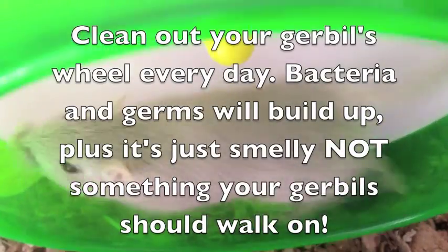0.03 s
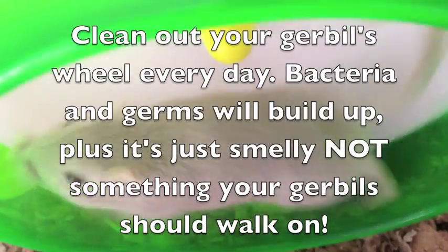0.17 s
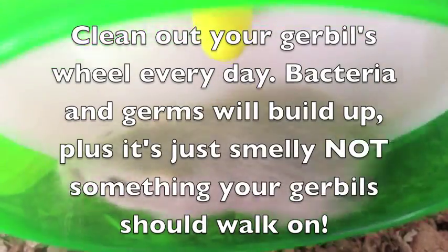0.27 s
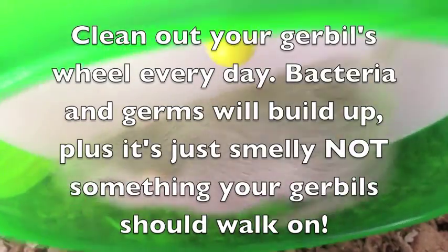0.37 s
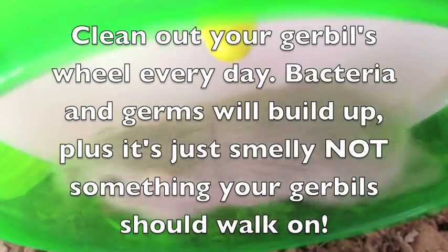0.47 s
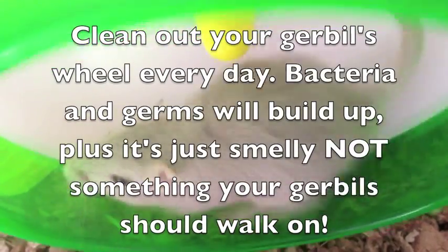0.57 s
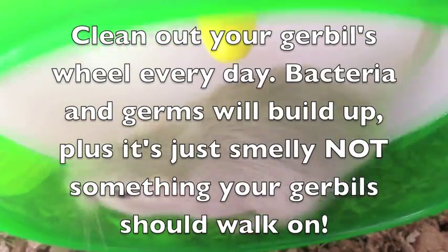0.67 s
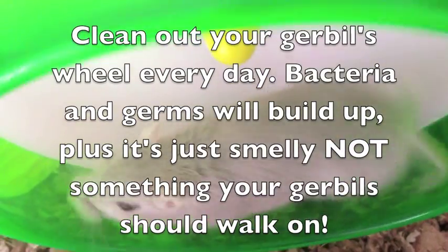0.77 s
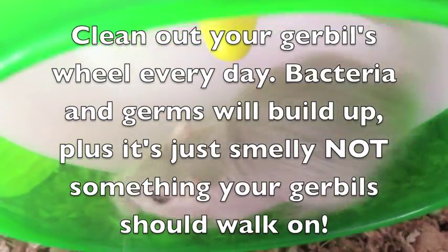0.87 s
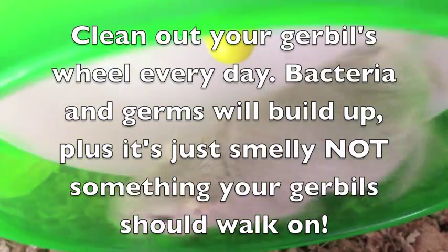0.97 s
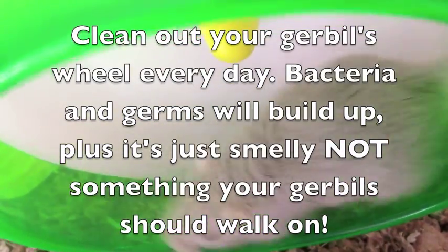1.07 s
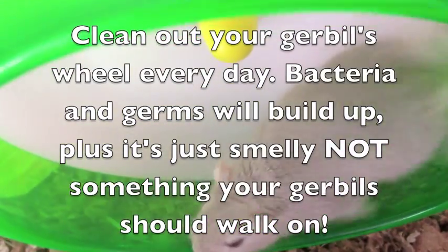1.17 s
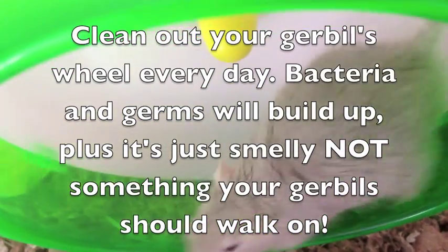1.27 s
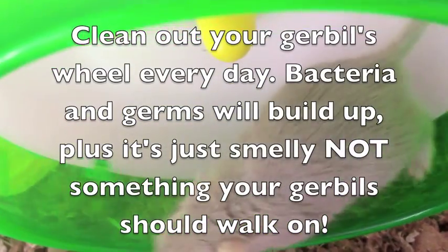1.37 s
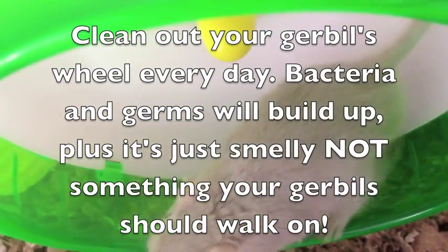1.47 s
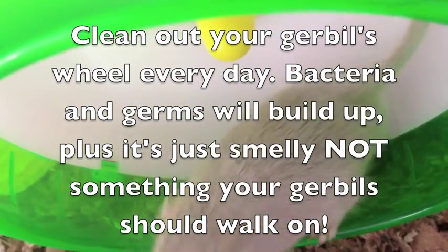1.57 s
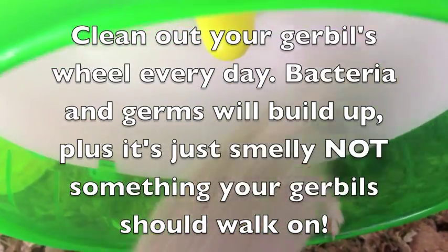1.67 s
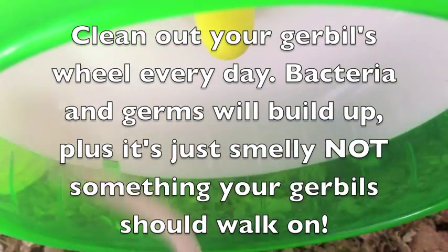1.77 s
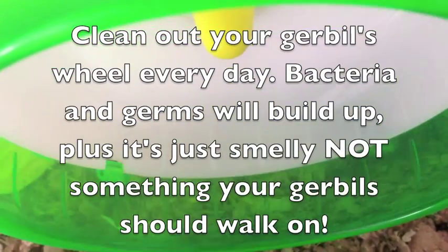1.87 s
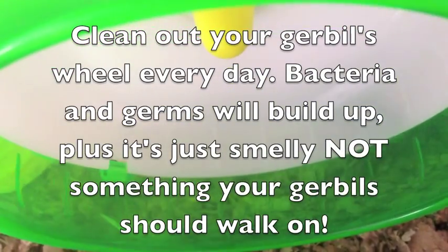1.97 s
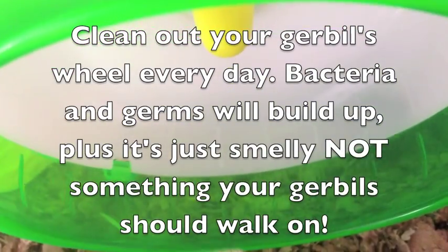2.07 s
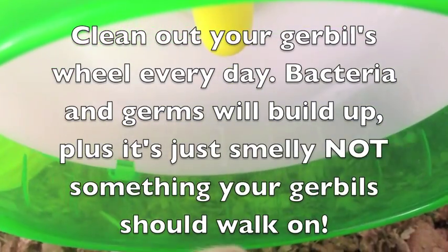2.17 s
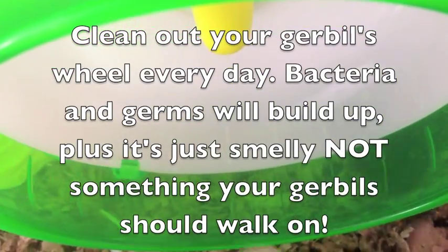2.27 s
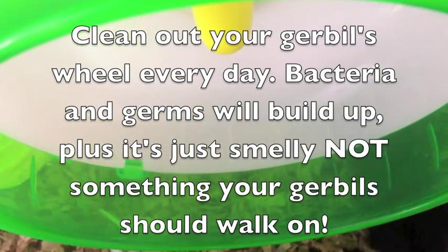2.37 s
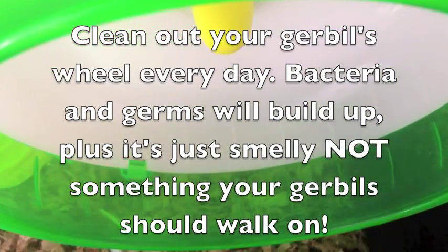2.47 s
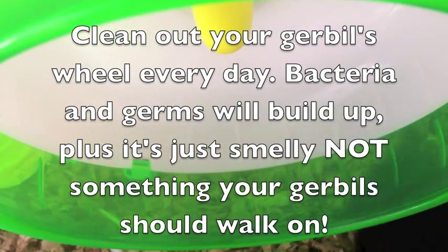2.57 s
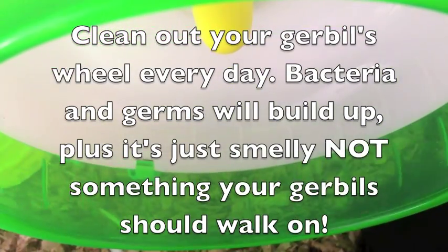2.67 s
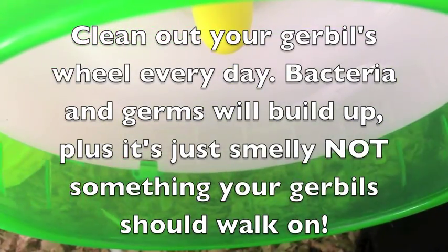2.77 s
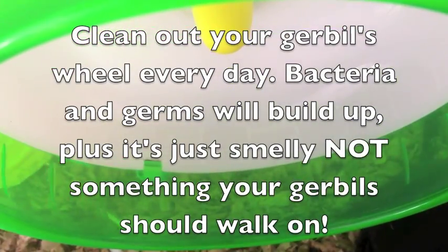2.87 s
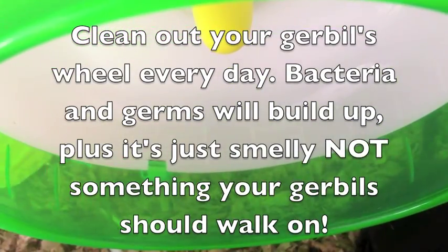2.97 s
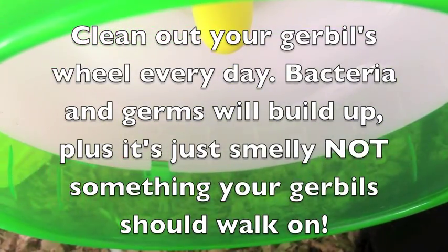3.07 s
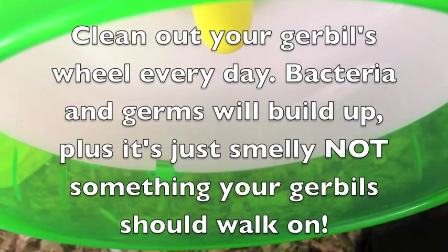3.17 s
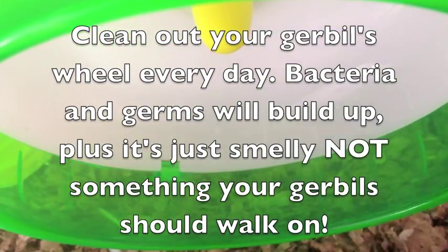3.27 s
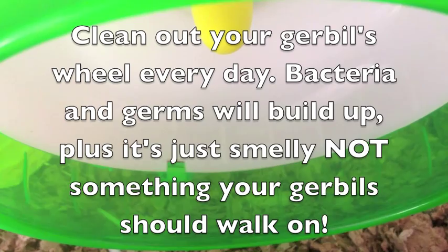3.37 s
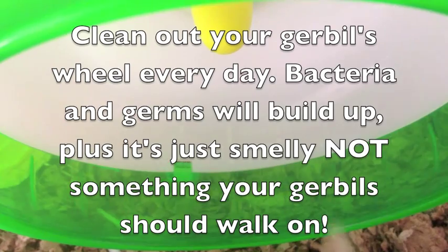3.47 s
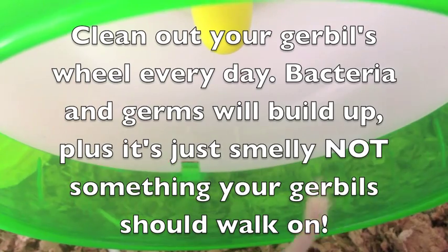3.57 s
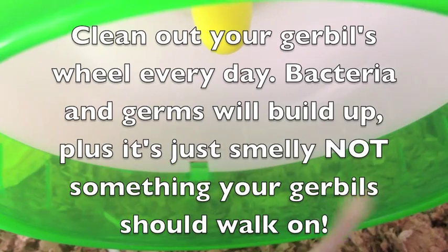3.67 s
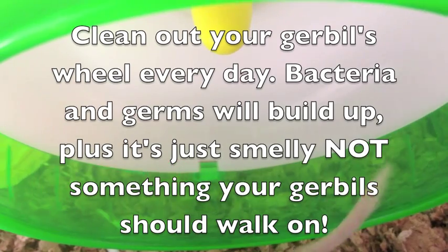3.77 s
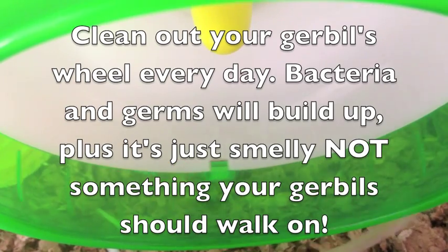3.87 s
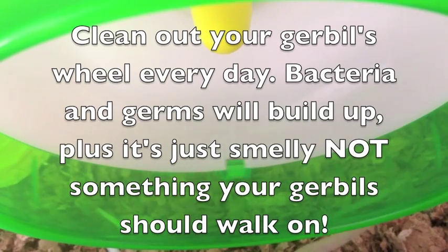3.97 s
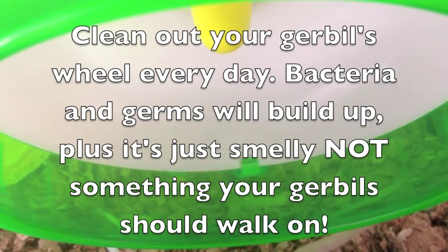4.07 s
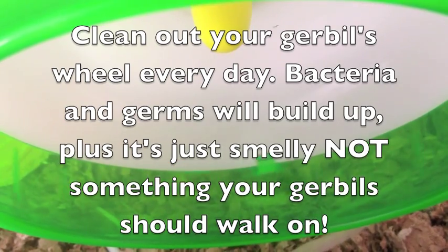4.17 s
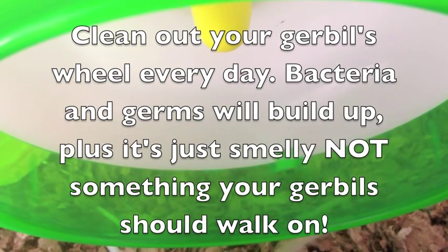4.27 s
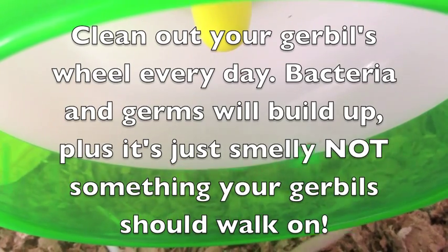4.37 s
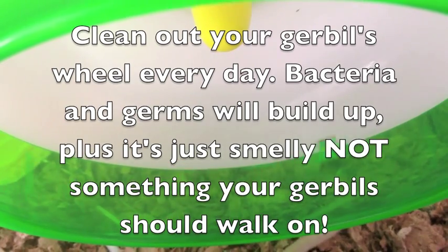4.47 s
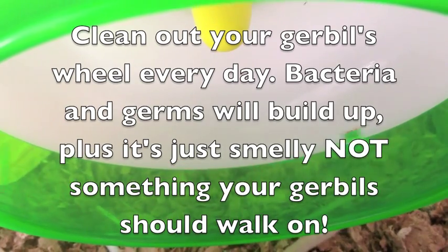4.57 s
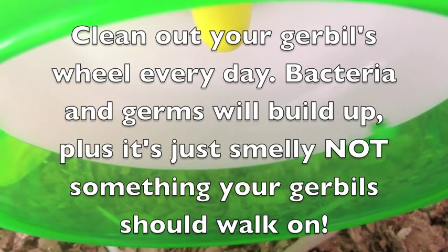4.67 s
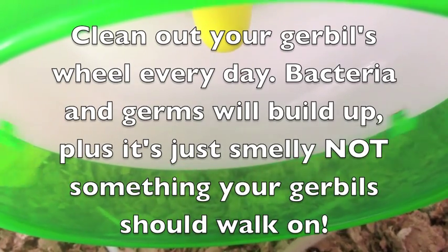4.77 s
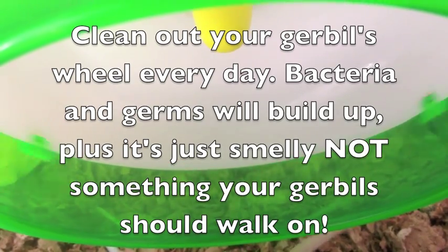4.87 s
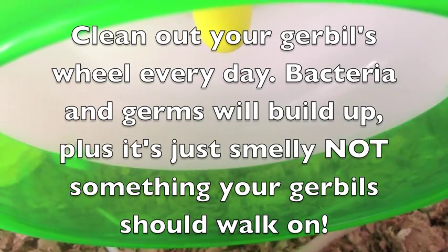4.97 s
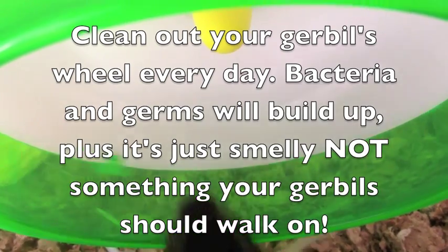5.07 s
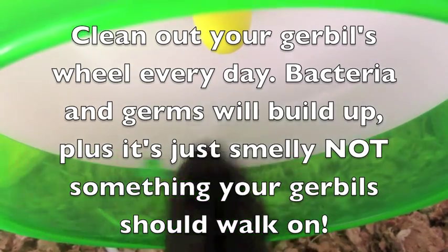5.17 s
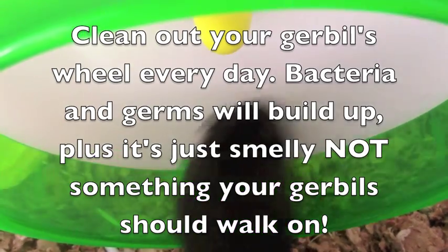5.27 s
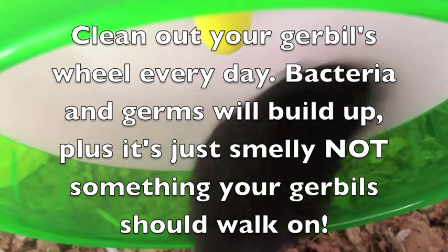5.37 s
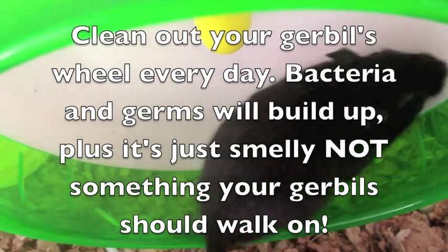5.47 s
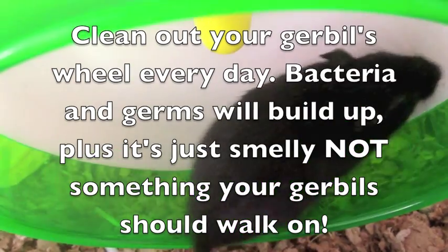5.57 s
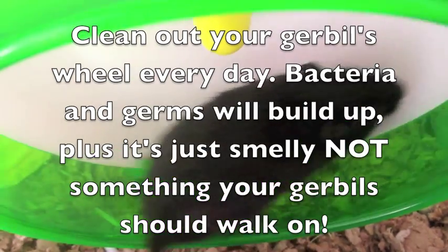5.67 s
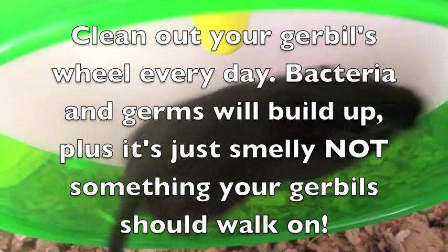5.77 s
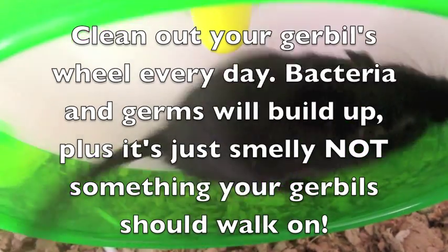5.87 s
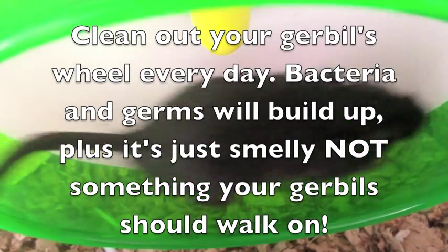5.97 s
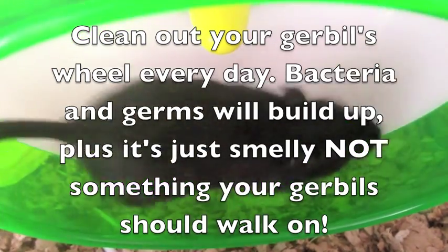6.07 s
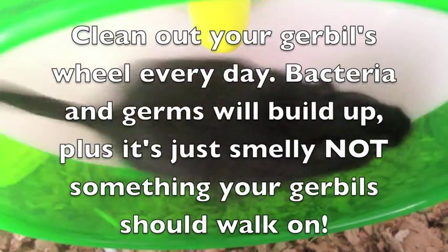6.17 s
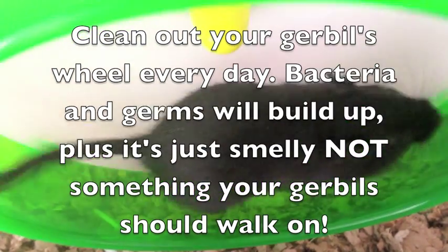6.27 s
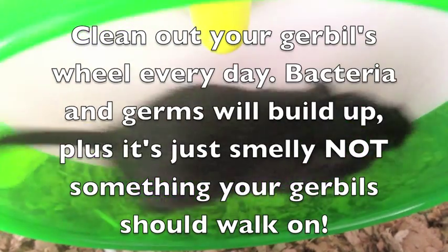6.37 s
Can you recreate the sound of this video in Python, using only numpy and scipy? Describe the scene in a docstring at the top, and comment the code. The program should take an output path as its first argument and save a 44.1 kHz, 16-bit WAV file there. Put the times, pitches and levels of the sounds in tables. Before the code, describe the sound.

A small rodent runs in a plastic wheel with light knocks and claw scratches that die away, then briefly resume.

```python
"""Rodent in an exercise wheel

A small rodent slows to a stop in a plastic wheel and hops out; later another climbs in.
Paws and the loose axle knock the drum into its normal modes, and claws scuff it by friction.
The cage thumps softly and bedding rustles, over a quiet room, a trace of mains hum and faint hiss."""
import sys
import numpy as np
from scipy import signal
from scipy.fft import rfft, irfft
from scipy.io import wavfile
from scipy.ndimage import uniform_filter1d

SR = 44100
rng = np.random.default_rng(int(sys.argv[2]) if len(sys.argv) > 2 else 0)


def to_wav(s):
    """Save 16-bit WAV."""
    ch = np.atleast_2d(s).T  # columns
    pcm = np.round(np.clip(ch, -1, 1) * 32767)  # PCM
    wavfile.write(sys.argv[1], SR, pcm.astype(np.int16))


N = 283238
TIME = np.arange(N) / SR


def amp(db):
    return 10 ** (np.asarray(db) / 20)


def unit_rms(x):
    return x / np.sqrt(np.mean(x ** 2) + 1e-20)


def unit_peak(x):
    return x / (abs(x).max() + 1e-20)


def add(mix, start, sound):
    """Superposition: a sound joins the mix at its start time in seconds."""
    part = mix[round(start * SR):][:len(sound)]
    part += sound[:len(part)]


def highpass(x, low_hz):
    """Low cut: a steep high-pass thins out the bass below low_hz."""
    return signal.sosfilt(signal.butter(4, low_hz, "high", fs=SR, output="sos"), x)


def coloured_noise(points, size):
    """Spectral shaping: noise of unit rms follows the points (f/Hz, level/dB)."""
    hz, db = np.transpose(points)
    bins_hz = np.fft.rfftfreq(size, 1 / SR)
    gain = amp(np.interp(np.log(bins_hz + 1), np.log(hz), db))
    return unit_rms(irfft(rfft(rng.standard_normal(size)) * gain, size))


def flutter(span_s):
    """Random modulation: smoothed noise of unit rms changes within about span_s."""
    size = max(round(span_s * SR), 1)
    return unit_rms(uniform_filter1d(uniform_filter1d(rng.standard_normal(N), size), size))


# Spectrum of the room's hum and hiss: f/Hz, relative density level/dB
ROOM_SPECTRUM = [(18, -63), (30, -58), (43, -23), (90, -15), (114, 1.5), (155, -4), (218, 2), (255, -19),
                 (368, -12.5), (430, -15), (707, -17.5), (827, -23), (1160, -18), (2230, -22.5),
                 (15400, -31.5)]
# Electrical hum: f/Hz, peak level/dB
MAINS_TONES = [(59.2, -88)]
def room(noise_db=-67.5):
    """Stationary background: a continuous noise spectrum plus the line of the mains."""
    mains = sum(amp(db) * np.sin(2 * np.pi * hz * TIME) for hz, db in MAINS_TONES)
    return amp(noise_db) * coloured_noise(ROOM_SPECTRUM, N) + mains


# Movement of the animals: t/s, rolling level/dB, rustle level/dB
ACTIVITY = [(0.0, -44.5, -64.5), (0.14, -50, -72), (0.27, -46, -63), (0.75, -51, -67), (0.95, -54, -70),
            (1.12, -58.5, -65), (1.29, -66, -70.5), (1.68, -70.5, -66), (1.88, -77.5, -81.5),
            (3.09, -78, -81), (3.34, -73, -66.5), (3.5, -77.5, -75.5), (4.59, -83.5, -85),
            (4.99, -77, -75.5), (5.18, -66, -72), (5.4, -77, -71.5), (5.65, -73, -75), (5.99, -69, -72.5),
            (6.24, -60, -59), (6.42, -67, -75)]
def activity_db():
    """Level envelopes: rolling and rustle each move linearly in dB between the given times."""
    times, rolling_db, rustle_db = np.transpose(ACTIVITY)
    return {"rolling": np.interp(TIME, times, rolling_db), "rustle": np.interp(TIME, times, rustle_db)}


def follow_rolling(db, slope, reference_db=-60):
    """Power law: a gain of db at the reference rolling level changes by slope dB per dB of rolling."""
    return amp(db + slope * (activity_db()["rolling"] - reference_db))


# Strokes of fur through the bedding: centre t/s, level/dB, half-width/s
FUR_STROKES = [(0.082, -65, .04), (.4, -62.5, .05), (0.553, -69, 0.037), (0.72, -65, 0.045),
               (.88, -66, .04), (1.326, -63, 0.034), (1.547, -52.5, 0.017), (1.79, -63.5, 0.027),
               (2.465, -67.5, 0.087), (2.593, -72.5, 0.067), (3.166, -69.5, 0.03), (3.279, -60, 0.017),
               (3.449, -62, 0.037), (3.74, -69.5, 0.052), (5.037, -66.5, 0.063), (5.204, -63, 0.03),
               (5.338, -65.5, 0.045), (5.764, -67, 0.11), (6.131, -54, 0.017), (6.236, -68, 0.021),
               (6.281, -54.5, 0.021), (6.407, -63.5, 0.037)]
def rustle_gain():
    """Incoherent addition: the powers of the slow rustle and of Gaussian strokes sum."""
    strokes = sum(amp(db) ** 2 * np.exp(-((TIME - centre) / half) ** 2)
                  for centre, db, half in FUR_STROKES)
    return np.sqrt(amp(activity_db()["rustle"]) ** 2 + strokes)


# Spectrum of fur on bedding: f/Hz, relative density level/dB
RUSTLE_SPECTRUM = [(1500, -7), (3000, 0.5), (5000, -3.5), (8000, -2.5), (12000, -3.5), (14000, -3),
                   (15500, 0.5)]
def bedding_rustle():
    """Friction noise: fur and bedding brush in uneven gusts, with tiny ticks of dry flakes."""
    ticks = amp(4.5 * np.minimum(rng.exponential(1, N), 3))
    ticks *= rng.random(N) < 150 / SR  # about 150 a second
    crackle = signal.oaconvolve(ticks, np.exp(-np.arange(900) / SR / 0.004))[:N]
    brush = coloured_noise(RUSTLE_SPECTRUM, N) * amp(1.5 * flutter(0.006)) * (1 + 0.15 * crackle)
    spectra = signal.stft(brush, nperseg=256, noverlap=192)[2]
    # the level wanders in patches of frequency and time
    patches = uniform_filter1d(rng.standard_normal(spectra.shape), size=3, axis=0)
    patches = unit_rms(uniform_filter1d(patches, size=20, axis=1))
    rustle = signal.istft(spectra * amp(2 * patches), nperseg=256, noverlap=192)[1][:N]
    return rustle_gain() * unit_rms(rustle)


# Resonances of the cage panels: f/Hz, bandwidth/Hz, relative level/dB
PANEL_MODES = [(151, 10, 9.5), (178, 49, 7), (224.3, 16.7, 13)]
def cage_shaking():
    """Forced vibration: lumpy noise swings the panels, more strongly as the wheel rolls."""
    t = np.arange(6000) / SR
    panels = sum(amp(db) * width * np.exp(-np.pi * width * t) * np.sin(2 * np.pi * hz * t)
                 for hz, width, db in PANEL_MODES)
    drive = rng.standard_normal(N) * amp(1.16 * flutter(0.02))
    return follow_rolling(db=-56.5, slope=0.58) * unit_rms(signal.oaconvolve(drive, panels)[:N])


# Soft pushes on the cage: t/s, level/dB, f/Hz, T60/s
CAGE_PUSHES = [(0.167, -34.5, 213.3, 0.082), (0.4, -38.5, 227, 0.11), (0.537, -41.5, 175, 0.12),
               (0.859, -44, 130, 0.39), (1.154, -43, 236, 0.059), (1.664, -44, 226, 0.11),
               (1.768, -47.5, 225, 0.11), (3.279, -48, 228.3, 0.16), (4.973, -53.5, 186.4, 0.62),
               (5.078, -46.5, 225, 0.11), (5.824, -36.5, 167, 0.03), (6.163, -42, 231, 0.024),
               (6.293, -45, 275, 0.17)]
def cage_thumps():
    """Free vibration: a soft push leaves one panel swinging as a damped sinusoid."""
    out, t = np.zeros(N), np.arange(9000) / SR
    for start, db, hz, t60 in CAGE_PUSHES:
        envelope = (1 - np.exp(-t / 0.004)) * amp(-60 * t / t60)
        add(out, start - 0.003, amp(db) * unit_peak(envelope * np.sin(2 * np.pi * hz * t)))
    return out


# Normal modes of the plastic drum: f/Hz, relative level/dB, T60/s at a damping factor of 1
DRUM_MODES = [(275, -3.5, 0.098), (335.4, -1, 0.2), (424, -3.5, 0.15), (591, 1, 0.19), (642, 4.5, 0.095),
              (775, 1, 0.051), (875, 1.5, 0.056), (929, -9.5, 0.16), (1201, 0, 0.077), (1441.5, -4, 0.075),
              (1524, 3, 0.052), (1425, -15, 0.24), (1664, -6.5, 0.13), (1868, -4.5, 0.06),
              (1973, -7, 0.044), (2250, -3, 0.07), (2500, -21, 0.064), (2760, -2, 0.072), (3075, -8, 0.077),
              (3483, -0.5, 0.057), (3540, -3, 0.048), (3650, -6, 0.083), (4120, -22, 0.063),
              (4160, -13, 0.028), (4163, -5.5, 0.079), (4390, 0, 0.041), (4820, -2, 0.052),
              (5264, -10, 0.071)]
MODE_HZ = np.transpose(DRUM_MODES)[0]
# Borders between the five families of modes: f/Hz
FAMILY_BORDERS = [500, 720, 1100, 2050]
def drum_responses(extra_db=0, phase=0, detune=1, damping=1.38):
    """Modal superposition: damped sinusoids sum to one impulse response per family, low to high."""
    hz, db, t60 = np.transpose(DRUM_MODES)[:, :, None]
    t = np.arange(5000) / SR
    extra_db, phase, detune = (np.reshape(v, (-1, 1)) for v in (extra_db, phase, detune))
    modes = amp(db + extra_db - 60 * damping * t / t60) * np.sin(2 * np.pi * hz * detune * t + phase)
    onset = (1 - np.exp(-t / 0.00088)) ** 2
    family = np.searchsorted(FAMILY_BORDERS, MODE_HZ)
    return onset * np.array([modes[family == k].sum(0) for k in range(len(FAMILY_BORDERS) + 1)])


# Weights of the four lower families in the rolling: relative level/dB
ROLLING_WEIGHTS = [-15, 0, 9.5, 4]
def wheel_rolling(taps_per_s=2500):
    """Shot-noise excitation: dense taps of paws and axle keep the drum humming; claws graze it."""
    taps = amp(1.8 * np.minimum(rng.exponential(1, (2, N)), 3)) * rng.standard_normal((2, N))
    taps *= rng.random((2, N)) < taps_per_s / SR
    paw_taps, claw_taps = taps * amp(2.2 * flutter(0.02))
    lower_modes = drum_responses(phase=rng.uniform(0, 2 * np.pi, len(MODE_HZ)), damping=4.66)[:-1]
    upper_modes = drum_responses(damping=3.4)[-1]
    hum = highpass(signal.oaconvolve(paw_taps, amp(ROLLING_WEIGHTS) @ lower_modes)[:N], 290)
    graze = highpass(signal.oaconvolve(claw_taps, upper_modes)[:N], 1960)
    return (amp(activity_db()["rolling"]) * unit_rms(hum)
            + follow_rolling(db=-72.5, slope=0.62) * unit_rms(graze))


# Slips of a claw: t/s, level/dB, accent f/Hz, relative ring level/dB, ring centre f/Hz
CLAW_SLIPS = [(0.0488, -54, 11300, 0.5, 3410), (0.0956, -48, 11800, -17, 3570),
              (0.1201, -49, 12900, 2.5, 4270), (0.1346, -44, 13000, -12, 3430),
              (0.191, -30.5, 7040, 4.5, 3700), (0.2648, -50, 8040, -5, 4210),
              (0.2932, -47, 12000, -18, 4230), (0.3217, -53, 6800, -9, 2730),
              (0.3646, -45, 7560, 7.5, 3470), (0.4165, -42, 11500, -13, 3420),
              (0.448, -46, 10200, -10, 3860), (0.5192, -53, 5530, -1, 3410), (0.5442, -49, 7700, 1.5, 3550),
              (0.5621, -48.5, 11300, -9, 2790), (0.5891, -45, 11400, -23, 3670),
              (0.6047, -41, 8200, -9.5, 3430), (0.6315, -45.5, 5500, 3.5, 2780),
              (0.7093, -52, 10800, 4, 3600), (0.7248, -49.5, 11800, -14, 3590),
              (0.7562, -46, 12600, -9, 3430), (0.7684, -48, 12900, -4, 3430), (0.8593, -52, 7660, 2, 3400),
              (0.889, -49, 13300, -10, 2720), (0.9218, -52, 8390, -8, 3280),
              (0.9423, -47.5, 11300, -8.5, 3410), (1.014, -55.5, 11800, -2, 2880),
              (1.1194, -61, 11000, 3, 3430), (1.1543, -53, 7470, 8.5, 2850),
              (1.268, -52.5, 9500, 3.5, 3540), (1.3384, -55, 12800, -1.5, 3570),
              (1.3684, -46, 12300, -17, 3440), (1.4541, -60, 7440, 0, 3510),
              (1.5278, -40, 12300, -11, 3510), (1.5434, -49, 12800, -1, 3460),
              (1.5638, -41.5, 6130, 4, 3450), (1.5974, -52.5, 12900, -2, 3600),
              (1.6484, -54.5, 9170, 0, 3980), (1.7724, -55, 7240, -8, 2950), (1.851, -59.5, 5600, 2, 3480),
              (2.4044, -66, 8500, -6, 4180), (2.4912, -58, 9000, -9, 4800), (2.576, -59, 11600, -5, 4640),
              (2.664, -56, 9900, -8, 2730), (3.1208, -61, 12000, -7, 4710), (3.2754, -52, 7600, -10, 3510),
              (3.4228, -53.5, 9100, -4.5, 4400), (3.663, -58.5, 13000, -12, 5150),
              (3.779, -62.5, 12700, -2, 3420), (5.073, -46.5, 8700, -9.5, 4220),
              (5.1178, -50.5, 11300, -4.5, 3610), (5.1711, -42.5, 11600, -15, 3570),
              (5.3033, -42, 11900, -22, 4210), (5.3742, -46.5, 12400, -13, 4190),
              (5.5443, -57.5, 11000, -27, 4270), (5.7344, -44.5, 11700, -14, 3510),
              (5.765, -56, 7660, -26, 3400), (5.8247, -51, 6000, 3, 3260), (5.8484, -55, 10500, -5, 3430),
              (5.9329, -47.5, 11800, -30, 4950), (6.1085, -57, 7340, -8, 3450),
              (6.1195, -48, 11400, -6, 3540), (6.2287, -43, 12100, -18, 5140),
              (6.2634, -52.5, 6860, -1, 2660), (6.2876, -51, 6780, -7, 2660)]
def claw_scuffs(rise_s=0.0027, t60_s=0.069):
    """Sliding friction: a claw gives a bright, grainy burst and excites the upper drum modes."""
    out, t = np.zeros(N), np.arange(6000) / SR
    hz = np.geomspace(2000, 22000, num=70)
    envelope = np.minimum(t / rise_s, 1) * amp(-60 * np.maximum(t - rise_s, 0) / t60_s)
    for start, db, accent_hz, ring_db, ring_hz in CLAW_SLIPS:
        octaves = np.log2(hz / accent_hz)
        colour_db = 5 * np.exp(-(octaves / 0.1) ** 2) - 8 * abs(octaves)
        colour_db += 3 * rng.standard_normal(len(hz))
        grain = unit_rms(uniform_filter1d(rng.standard_normal(len(t)), size=60))
        friction = envelope * amp(0.73 * grain)
        hiss = coloured_noise(np.transpose([hz, colour_db]), len(t)) * friction
        upper_modes = drum_responses(extra_db=10 * np.exp(-((MODE_HZ - ring_hz) / 300) ** 2))[-1][:3000]
        ring = signal.fftconvolve(rng.standard_normal(len(t)) * friction, upper_modes)[:len(t)]
        add(out, start - 0.0015, amp(db) * (0.39 * hiss + amp(ring_db) * unit_peak(ring)))
    return highpass(out, 1450)


# Blows of paws and axle: t/s, level/dB, favoured f/Hz, relative level/dB of families 1, 2, 4 and 5
# (weight, hollowness, brightness, claw), contact time/s, damping factor (a resting paw damps more)
DRUM_BLOWS = [(0.104, -30, 650, -17.5, -6, -8.5, -28, 0.0049, 0.99),
              (0.192, -14, 1490, -29, -8, -3, -9.5, 0.0046, 1.34),
              (0.226, -32, 649, -9, -12, -16, -14, 0.0041, 1.35),
              (0.32, -26.5, 590, -29, -9.5, -13, -32, 0.0045, 1.7),
              (0.362, -20.5, 1530, -26.5, -16, -2, -14, 0.0023, 1.9),
              (0.376, -18.5, 910, -18, -9, -6.5, -16, 0.0081, 1.23),
              (0.431, -30.5, 870, -15, -23, -6, -27, 0.0042, 1.35),
              (0.544, -15.5, 870, -26.5, -10, -7.5, -26, 0.0026, 1.56),
              (0.631, -24.5, 1440, -28.5, -8.5, -3, -12, 0.0077, 1.26),
              (0.794, -33.5, 580, -15, -7.5, -5.5, -32, 0.0045, 1.7),
              (0.829, -32.5, 791, -20, -4.5, -8.5, -21, 0.0041, 1.25),
              (0.859, -19.5, 1680, -29.5, -14, -4, -22, 0.0086, 1.3),
              (1.156, -23, 1500, -25, -13, -3.5, -14, 0.0015, 1.15),
              (1.271, -40.5, 640, -23, -2.5, -16, -26, 0.0054, 1.35),
              (1.432, -57, 580, -15, 7.5, -35, -23, 0.0031, 1.3),
              (1.565, -51.5, 1470, -27, -2, 8, -4, 0.0054, 1.4),
              (1.767, -36, 565, -13.5, -8, -14, -22, 0.007, 1.85),
              (1.852, -51, 494, -4, -2.5, -18, -6, 0.0029, 2.1),
              (2.665, -68.5, 1390, -18, -18, 6.5, 2, 0.0038, 1.8),
              (3.665, -48, 600, -18, -4, -29, -21, 0.006, 1.25),
              (4.967, -31.5, 556, -23.5, -8.5, -22, -27.5, 0.011, 1.27),
              (5.04, -42.5, 720, -13.5, -10, -17, -25, 0.0045, 1.5),
              (5.238, -36, 660, -22, -10.5, -8, -29, 0.003, 1.4),
              (5.736, -53, 633, -23, -6, -10, -17, 0.0023, 1.1),
              (5.824, -29.5, 557, -10, -8.5, -12.5, -18.5, 0.0028, 1.5),
              (5.848, -35.5, 619, -9, -3.5, -6.5, -17, 0.0045, 1.2),
              (5.87, -35.5, 577, -28, -7, -9, -24, 0.0055, 1.3),
              (6.152, -31, 570, -28, -3, -4, -35, 0.011, 1.48),
              (6.289, -41.5, 953, -19, -9, -2.5, -7.5, 0.0028, 1.4),
              (6.313, -40.5, 940, -14, -15, -12, -25, 0.0041, 1.35)]
def drum_knocks(middle_db=-6):
    """Impact excitation: a blow rings the drum, and the point of contact decides which modes speak."""
    out, t = np.zeros(N), np.arange(2500) / SR
    touch = 2.37 * np.exp(-((t - 0.0006) / 0.000079) ** 2)
    chatter = 0.25 * np.exp(-t / 0.013)  # the parts settle after the blow
    for start, db, favoured_hz, weight_db, hollow_db, bright_db, claw_db, contact, damping in DRUM_BLOWS:
        place, load = rng.standard_normal((2, len(MODE_HZ)))
        place_db = 2.25 * place + 6 * np.exp(-((MODE_HZ - favoured_hz) / 60) ** 2)
        envelope = np.minimum(t / 0.0019, 1) * (np.exp(-(t / contact) ** 2) + chatter)
        force = touch + rng.standard_normal(len(t)) * envelope
        responses = drum_responses(place_db, detune=1 + 0.016 * load, damping=damping)
        families = signal.fftconvolve(responses, force[None], axes=1)
        gains = amp([weight_db, hollow_db, middle_db, bright_db, claw_db])
        knock = sum(gain * unit_peak(family) for gain, family in zip(gains, families))
        add(out, start - 0.0015, amp(db) * knock)
    return highpass(out, 145)


def scene():
    """Linear superposition: room, cage, wheel and bedding add in one channel."""
    background = room()
    cage = highpass(highpass(cage_thumps() + cage_shaking(), 119), 119)
    wheel = drum_knocks() + claw_scuffs() + wheel_rolling()
    return (background + cage + wheel + bedding_rustle())[None]


def record(dry, cutoff_hz=15480):
    """Band limiting: a steep linear-phase low-pass removes the highest treble."""
    lowpass = signal.firwin(1023, cutoff_hz, window=("kaiser", 9), fs=SR)
    return signal.oaconvolve(dry, lowpass[None], "same")


dry = scene()
out = record(dry)
to_wav(out)
```